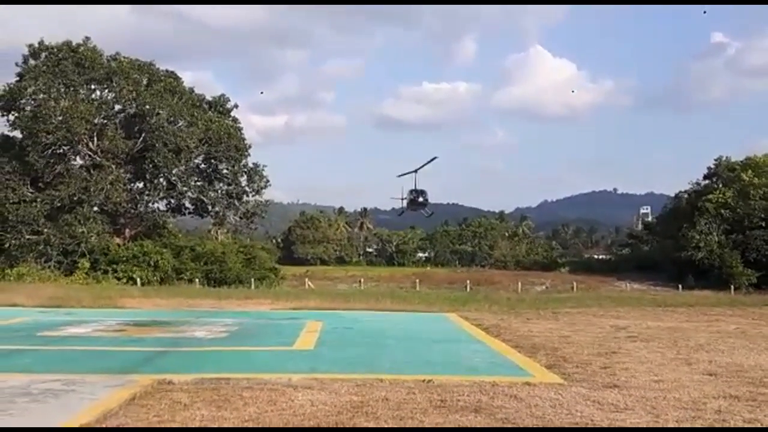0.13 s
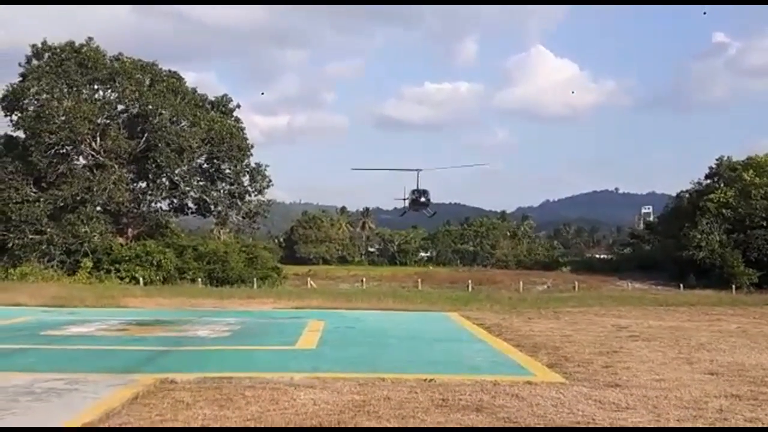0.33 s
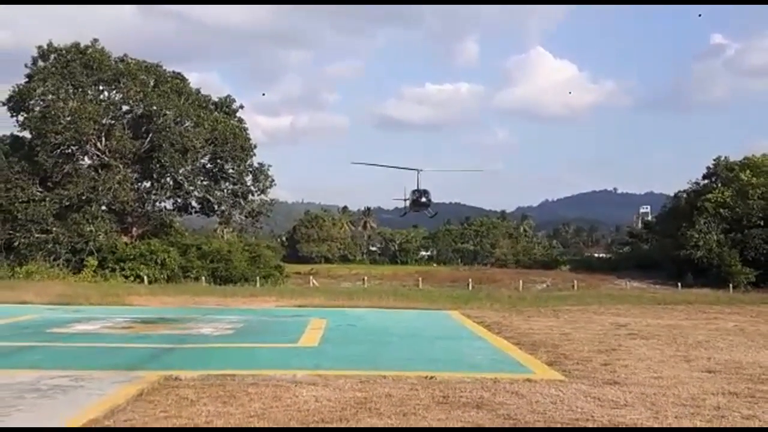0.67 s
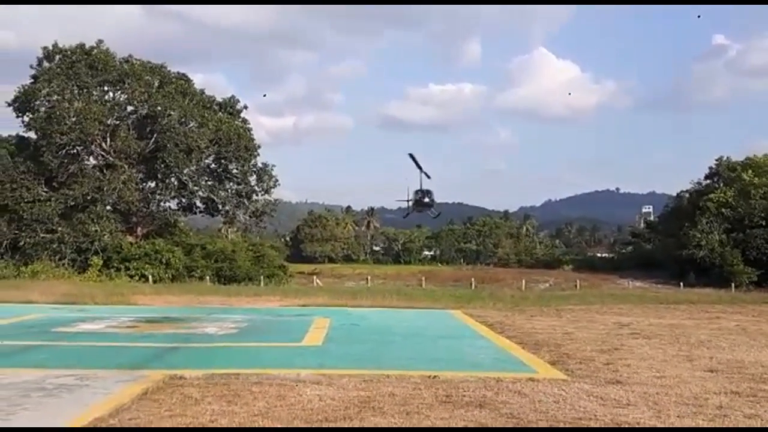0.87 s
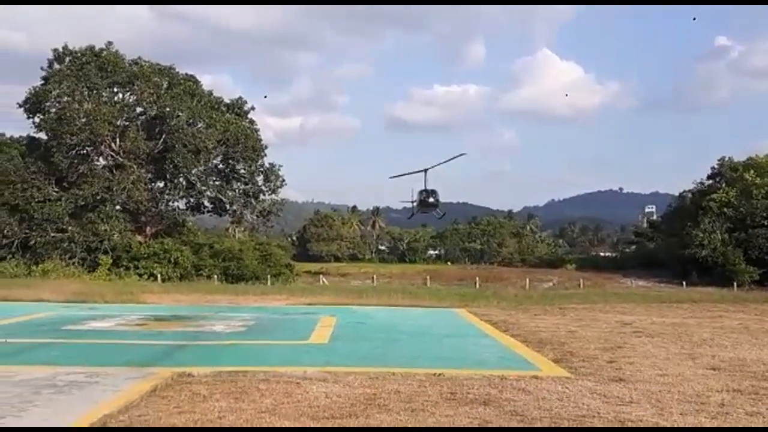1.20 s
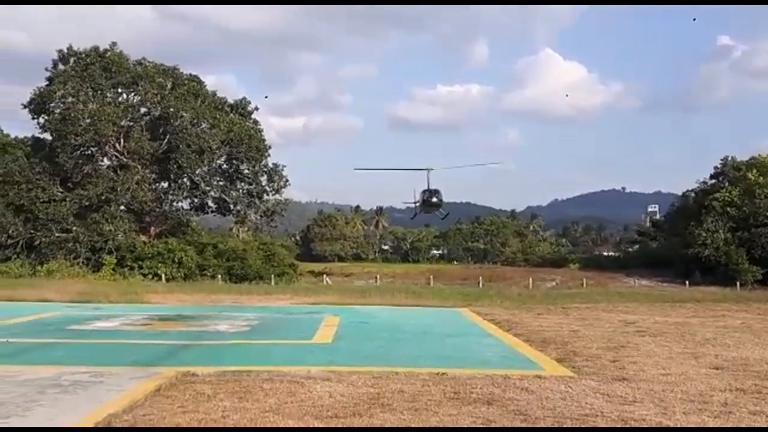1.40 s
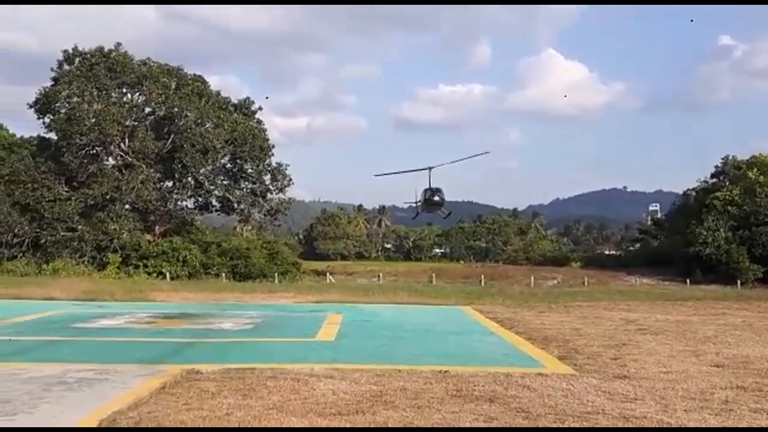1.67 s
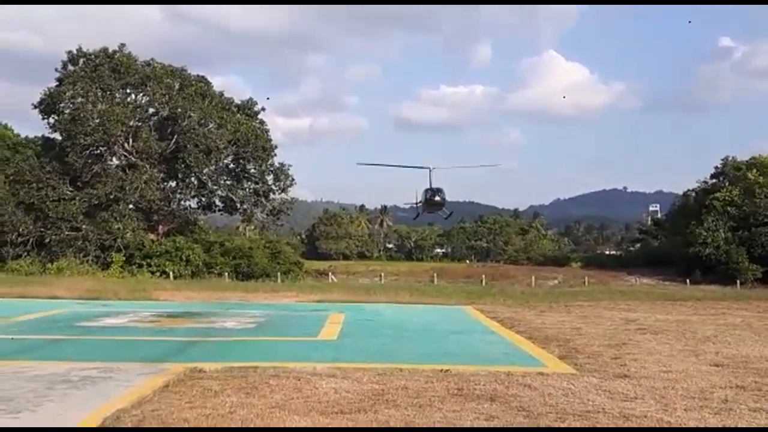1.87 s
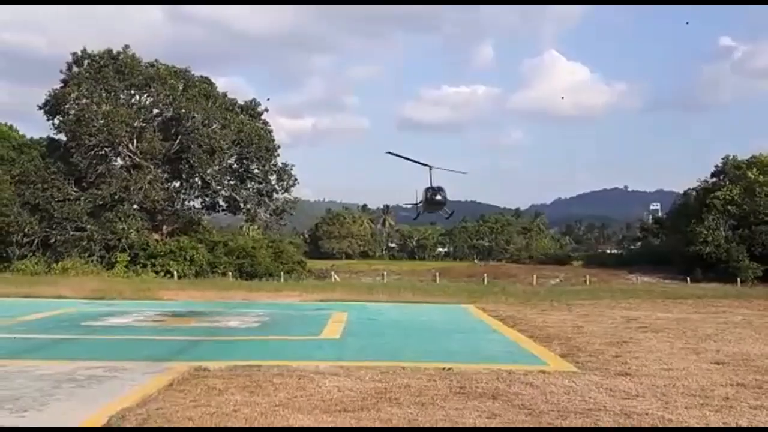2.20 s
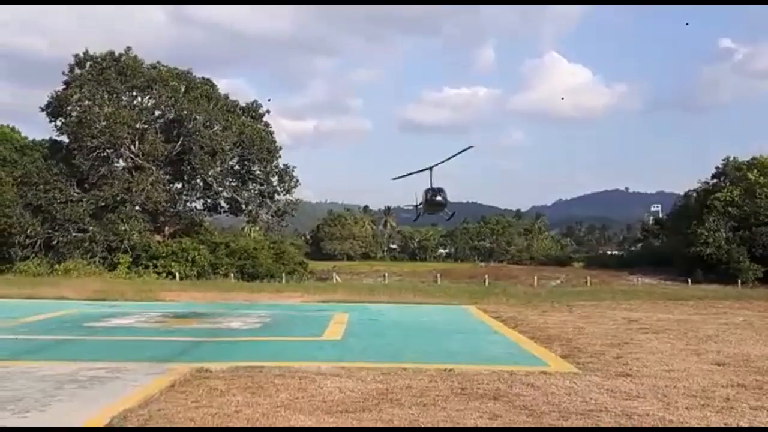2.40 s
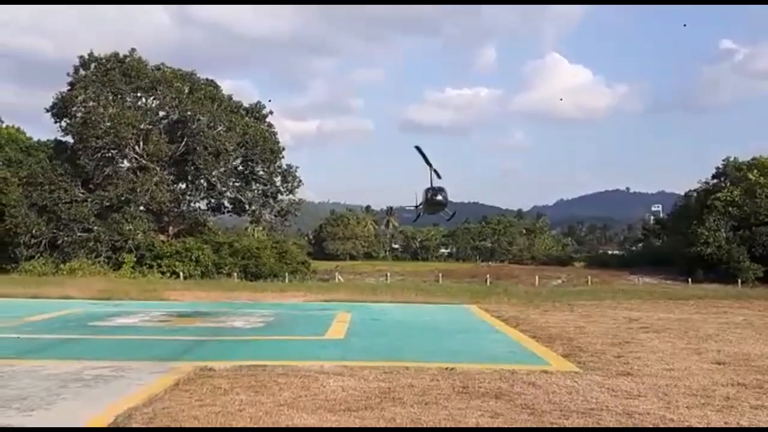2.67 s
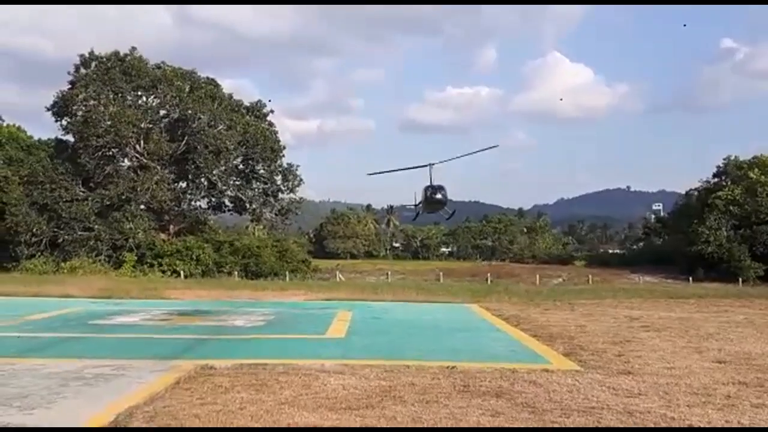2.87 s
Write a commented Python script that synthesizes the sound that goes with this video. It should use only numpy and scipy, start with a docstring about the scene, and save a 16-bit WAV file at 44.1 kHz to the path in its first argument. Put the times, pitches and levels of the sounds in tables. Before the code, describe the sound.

The rotor of a small helicopter chops fast and evenly throughout, each slap echoing briefly off trees. Behind it are a steady drone, a wavering low hum and a thin whine, heard through a phone across a field.

```python
"""A small helicopter creeps toward a pad, some tens of metres from a phone on open grass.
About seven times a second a blade slaps: its pressure swing is a low thump, and cutting its own wake
makes a short ragged crack that the tree line echoes. Behind the slaps engine and downwash drone, a low
hum wavers and a thin gear whine flickers. Over the ground the sound arrives dull, with no treble."""
import sys
import numpy as np
from scipy import signal
from scipy.fft import rfft, irfft, next_fast_len
from scipy.io import wavfile
from scipy.ndimage import uniform_filter1d, minimum_filter1d

SR = 44100
rng = np.random.default_rng(int(sys.argv[2]) if len(sys.argv) > 2 else 0)


def file_out(sig):
    """Save sig as 16-bit WAV at sys.argv[1]."""
    # one column per channel
    cols = np.atleast_2d(sig).T
    # limit, then scale
    lim = np.clip(cols, -1, 1)
    pcm = np.round(lim * 32767).astype(np.int16)
    wavfile.write(sys.argv[1], SR, pcm)


N = 134505
T = np.arange(N) / SR
SIZE = next_fast_len(N + 8192)
HZ = np.maximum(np.arange(SIZE // 2 + 1) * SR / SIZE, 1)


def undb(db):
    """Decibels to gain."""
    return 10 ** (np.asarray(db) / 20)


def by_hz(table):
    """A (frequency, value) table at every bin."""
    hz, values = np.array(table, float).T
    return np.interp(np.log(HZ), np.log(hz), values)


def by_time(table):
    """A (time, value) table at every sample."""
    return np.interp(T, *np.array(table, float).T)


def causal(gain):
    """Minimum-phase response with this gain."""
    cepstrum = irfft(np.log(gain + 1e-7), SIZE)
    cepstrum[1:] *= 2
    return np.exp(rfft(cepstrum[:SIZE // 2], SIZE))


def walk(rate):
    """Random levels held 1 / rate seconds and smoothed twice."""
    hold = int(SR / rate)
    steps = np.repeat(rng.standard_normal(N // 20)[:N // hold + 1], hold)[:N]
    return 1.3 * uniform_filter1d(uniform_filter1d(steps, hold), hold)


def bands(gain, centres):
    """Split a gain over frequency into overlapping bands."""
    return [gain * np.sqrt(np.interp(np.log(HZ), np.log(centres), one)) for one in np.eye(len(centres))]


def panned(sound, pan_db):
    """Place a sound between the microphones; pan_db is left minus right."""
    return sound * undb(np.array([[.5], [-.5]]) * pan_db)


def tone(hz, db, pan_db):
    """A sine of moving pitch and level."""
    return panned(np.sqrt(2) * undb(db) * np.sin(2 * np.pi * np.cumsum(hz) / SR), pan_db)


# How alike the phone's two microphones hear (frequency [Hz], likeness [ratio])
MIC_LIKENESS = [(60, 0.9), (130, 0.73), (330, 1.03), (580, 0.19), (1020, 0.08), (1790, 0.16), (3150, 0.32)]
# Left microphone minus right (frequency [Hz], level [dB])
MIC_PAN = [(40, -2.5), (130, -3.5), (330, -2.5), (800, -1), (1400, -3.5), (2500, -7)]
LOW_PAN_DB = MIC_PAN[0][1]

def stereo_noise(envelope, response):
    """Noise under an envelope through a response, partly alike in the two microphones."""
    mid, side = rfft(envelope * rng.standard_normal((2, N)), SIZE) * response
    alike = np.clip(by_hz(MIC_LIKENESS), 0, 1)
    mid, side = mid * np.sqrt((1 + alike) / 2), side * np.sqrt((1 - alike) / 2)
    return irfft(panned(np.array([mid + side, mid - side]), by_hz(MIC_PAN)), SIZE)[:, :N]


# Peaks and notches of the path over tens of metres of grass (frequency [Hz], gain [dB])
GROUND_PATH = [(13, -35.5), (22, -3), (43, 3), (71, 0.5), (88, -4), (109, -14.5), (119, -15), (138, -15.5),
               (186, -0.5), (207, 1.5), (267, -11.5), (316, -6), (436, -5.5), (485, -12), (575, -10),
               (654, -13), (809, -19), (939, -10), (1040, -17), (1190, -18), (1350, -28.5), (1640, -30.5),
               (1860, -37), (2610, -44.5), (3600, -62), (4680, -74.5), (7920, -120)]
# The drone's colour before that path (frequency [Hz], gain [dB])
DRONE_COLOUR = [(20, -7), (40, -5.5), (65, -6), (85, -3), (130, 1.5), (300, -1), (600, -1.9), (1000, -3.5),
                (2000, 2), (3500, 1.4), (4300, 4), (5500, 4)]
# The drone's course at the phone (time [s], relative level [dB])
DRONE_LEVEL = [(0.0, -37.5), (0.29, -36.5), (0.64, -37.5), (1.12, -35.5), (2.18, -37.5), (3.05, -40)]
# Rise and fall of the drone below 100 Hz, and of the hum (time [s], gain [dB])
RUMBLE_GAIN = [(0, -1.5), (.5, 4.5), (.9, 1), (1.3, -3.5), (1.7, 4.5), (2.1, -2.5), (2.5, 0), (2.8, -0.1),
               (3.05, 4.5)]

def drone(lift_db=1, flicker_db=1.5):
    """Engine and downwash across the grass: noise bands that swell together and flicker alone."""
    centres = 25 * 2 ** np.arange(0, 8, .5)
    swell_db = by_time(DRONE_LEVEL) + lift_db + walk(9)
    gain = undb(by_hz(GROUND_PATH) + by_hz(DRONE_COLOUR)) * (HZ > 20)
    gain /= np.sqrt(np.mean(gain ** 2))
    out = 0
    for hz, band in zip(centres, bands(gain, centres)):
        db = swell_db + flicker_db * walk(24.91) + (hz < 100) * by_time(RUMBLE_GAIN)
        out += stereo_noise(undb(db), band)
    return out


def hum(hz=79.3, db=-44.5):
    """A low wavering hum that rises and falls with the rumble."""
    return tone(hz * (1 + .03 * walk(5.956)), db + by_time(RUMBLE_GAIN) + 2 * walk(10), LOW_PAN_DB)


# The gear whine at the phone, before its flicker (time [s], level [dB])
WHINE_LEVEL = [(0, -75), (.2, -65), (.45, -69), (.65, -65), (.85, -67), (1.0, -74), (1.25, -70),
               (1.6, -70.5), (1.75, -68), (2.2, -68), (2.4, -72), (2.6, -77), (3.05, -79)]

def gear_whine(hz=2531):
    """The gears sing one thin, flickering tone, a little to the right."""
    return tone(hz * (1 + .00098 * walk(27)), by_time(WHINE_LEVEL) + 2.2 * walk(25), pan_db=-4)


# Blade slaps at the phone (crack time [s], thump base level [dB], 7 crack band base levels [dB],
# echo against crack [dB], thump pitch [Hz], ringing pitches of the 5 lowest bands [Hz])
SLAPS = [(0.063, -35.5, -32, -32.0, -36.5, -39.5, -43, -55, -72.5, -10.5, 54, 219.4, 325, 578, 902, 1157),
         (0.207, -33, -30.5, -29.5, -33.0, -37, -42.5, -51, -71, -16, 49.5, 223.4, 392, 592, 963, 1165),
         (0.352, -37.5, -29.5, -29.5, -36.5, -43, -44.5, -48, -71, -1.5, 53, 196.2, 299.7, 549, 963.4, 1164),
         (0.499, -34.5, -27, -30.5, -31.5, -33, -44.0, -45.5, -68, -11.5, 61, 226, 289.3, 549, 935, 1174),
         (0.646, -32.5, -36.5, -36, -30, -37, -34.5, -45.0, -67, -16.5, 58.04, 232, 331.2, 576, 908, 1154),
         (0.791, -35.5, -26.5, -34, -33.5, -41, -43.0, -48.5, -71, -6.5, 46.24, 234, 289.7, 567, 999, 1102),
         (0.938, -35, -27.5, -35.5, -34, -37, -40, -53.5, -66.5, -7, 50.42, 202.6, 290.2, 511, 982.6, 1171),
         (1.085, -32.5, -28.5, -29, -29.5, -30.5, -41, -49.5, -67, -16.5, 56.06, 192.1, 312.2, 538, 952.3, 1180),
         (1.234, -32, -37, -32.5, -33, -35, -49.5, -50.0, -69.5, -5, 55, 204.3, 321.8, 584, 923, 1115),
         (1.374, -31, -28.5, -28.5, -33, -37, -40.5, -47, -70.5, -5.5, 58.7, 203.1, 321.3, 589, 958.7, 1150),
         (1.525, -32.5, -23.5, -30.0, -32, -33.5, -39.5, -46, -66, -7, 59, 193, 390.3, 479, 929, 1089),
         (1.668, -33, -30, -27.5, -32, -40.5, -43.5, -46, -70, -7, 51, 201, 313.1, 559, 968, 1087),
         (1.813, -32.5, -28.5, -32, -32, -39.5, -45.5, -47.5, -70.5, -5, 44.06, 242.9, 291.7, 567, 958, 1155),
         (1.962, -35, -28, -32, -38.5, -34.5, -39.5, -48, -69.5, -15.5, 51, 212, 294.1, 460, 941.6, 1164),
         (2.107, -32, -35, -30.5, -31.5, -34.5, -42.5, -47, -69.5, -15.5, 50.2, 193.1, 287.2, 460, 921, 1086),
         (2.247, -35, -25.5, -40, -34.5, -39.5, -45.5, -46, -67.5, -5.5, 45.15, 199, 308.2, 629, 963, 1146),
         (2.398, -33.5, -29, -39, -31.5, -40.5, -46.5, -46, -67.5, -11.5, 47.5, 173, 290.7, 565, 923, 1160),
         (2.546, -29.5, -30, -33, -29.5, -41.5, -46, -50.5, -72, -12.5, 51.05, 220.4, 392.2, 541, 945.5, 1129),
         (2.686, -30.5, -31.5, -31, -33, -37.0, -48.5, -50.5, -71, -11.5, 62.76, 231.9, 290.6, 465, 968, 1145),
         (2.833, -28, -28.5, -34.5, -36.5, -39.5, -45.5, -51, -72, -10.5, 59, 181.1, 299, 597, 960, 1089),
         (2.98, -31.5, -27.0, -35.5, -41, -42.5, -50.5, -51.5, -69.5, -7, 62, 203.9, 288.2, 481, 961, 1155)]
FIRST_BLADE_S, BLADE_GAP_S = .06284, .14585

def blade_thumps(lift_db=9):
    """Each blade passage pushes a pressure swing across the field, then a slower, weaker one."""
    def swing(at, hz, width_s):
        return np.cos(2 * np.pi * hz * (T - at)) * np.exp(-.5 * ((T - at) / width_s) ** 2)

    out = 0
    for k, slap in enumerate(SLAPS):
        at = FIRST_BLADE_S + k * BLADE_GAP_S
        thump = swing(at + .014, hz=slap[10], width_s=.008)
        boom = undb(-12.5) * swing(at + .042, hz=41.2, width_s=.01)
        out += undb(slap[1] + lift_db) * (thump + boom)
    return panned(out, LOW_PAN_DB)


def burst(t, hold_s, release_s, attack_s=.0072):
    """Attack, hold, exponential release."""
    return np.clip(t / attack_s, 0, 1) * np.exp(-np.maximum(t - attack_s - hold_s, 0) / release_s)


# The crack's bright edge before the ground path (frequency [Hz], gain [dB])
CRACK_COLOUR = [(3000, -1.5), (4500, 5)]
# The crack's seven bands at the phone, one list for each of (centre [Hz], delay [s], hold [s],
# release [s], tree-line echo colour [dB], scattered tail [dB], noise trim [dB], ringing trim [dB])
BAND_HZ = [210, 340, 570, 950, 1170, 2000, 3500]
DELAY_S = [0.0034, -0.0017, -0.00018, .003, .001, .001, .001]
HOLD_S = [.009, .003, .008, 0.011, 0.011, 0.01, 0.0097]
RELEASE_S = [0.0049, .007, 0.0056, 0.0068, 0.0071, 0.0049, 0.0064]
ECHO_COLOUR_DB = [-0.3, -1, -0.1, 1.5, -1, -5, -3]
TAIL_DB = [-11, -10, -9, -14.5, -10, -10, -6]
RASP_DB, RING_DB = [-2.5, -3.5, -1.5, -1.5, -1, 3.5, 2], [.3, .51, -.25, -.032, .3]

def blade_cracks(lead_s=.0048, echo_delay_s=.033, ragged_db=2):
    """The blade cuts its own wake: a ragged, ringing burst, an echo off the trees, a scattered tail."""
    ragged = undb(ragged_db * walk(280))
    path = causal(undb(by_hz(GROUND_PATH) + by_hz(CRACK_COLOUR))) * (HZ > 110)
    slaps = np.array(SLAPS)
    # each slap takes over a fifth of a blade gap before its time
    current = np.searchsorted(slaps[:, 0], T + BLADE_GAP_S / 5) - 1
    slap = slaps[np.maximum(current, 0)].T
    onset, crack_db, echo_db, ring_hz = slap[0], slap[2:9], slap[9], slap[11:]
    out = 0
    for k, band in enumerate(bands(path, BAND_HZ)):
        t = T - onset + lead_s - DELAY_S[k]
        direct = burst(t, HOLD_S[k], RELEASE_S[k])
        echo = undb(echo_db + ECHO_COLOUR_DB[k]) * burst(t - echo_delay_s, HOLD_S[k] / 2, .0066)
        tail = undb(TAIL_DB[k]) * burst(t, HOLD_S[k], release_s=.071)
        envelope = undb(crack_db[k] + RASP_DB[k]) * np.sqrt(direct ** 2 + echo ** 2 + tail ** 2)
        out += stereo_noise(envelope * ragged, band / np.sqrt(np.mean(abs(band) ** 2)))
        if k < len(RING_DB):
            ringing = np.hypot(direct, undb(-3.5) * echo)  # the echo rings less
            ringing = uniform_filter1d(ringing * ragged, int(SR / BAND_HZ[k]))
            hz = ring_hz[k] * (1 + .028 * walk(120))
            db = crack_db[k] + RING_DB[k] + 1.2 * walk(100)
            out += ringing * tone(hz, db, pan_db=np.interp(BAND_HZ[k], *np.array(MIC_PAN).T))
    return out


def scene():
    """The helicopter from the grass: hum, whine and drone behind the slapping rotor."""
    return hum() + gear_whine() + blade_thumps() + blade_cracks() + drone()


def record(dry, ceiling=.21, top_hz=5600):
    """The phone's limiter holds the loudest peaks and the top is cut off."""
    gain = minimum_filter1d(ceiling / np.maximum(abs(dry).max(0), ceiling), size=400)
    gain = uniform_filter1d(uniform_filter1d(gain, size=200), size=200)
    return signal.sosfilt(signal.ellip(8, .2, 70, top_hz, fs=SR, output="sos"), dry * gain)


dry = scene()
out = record(dry)
file_out(out)
```